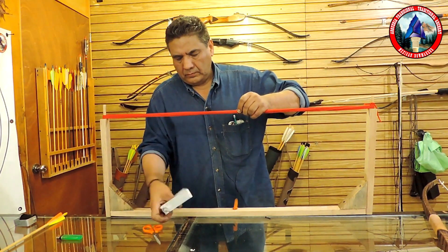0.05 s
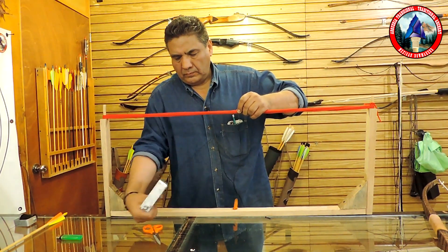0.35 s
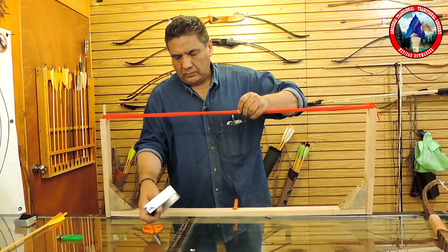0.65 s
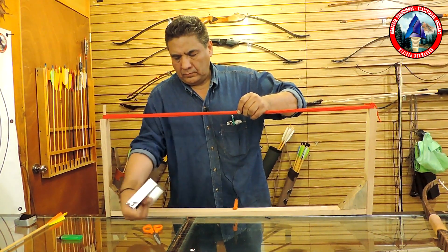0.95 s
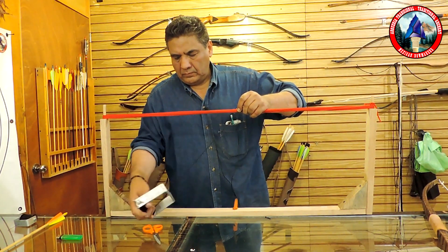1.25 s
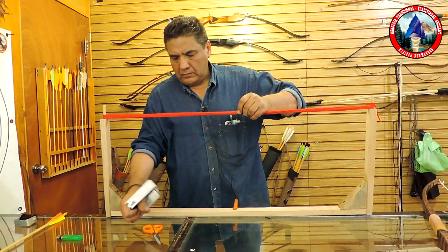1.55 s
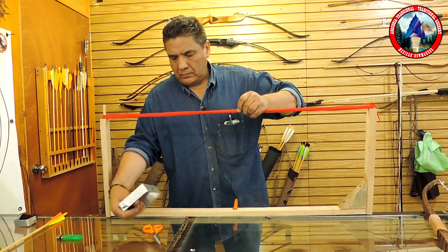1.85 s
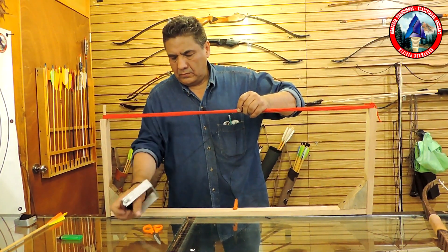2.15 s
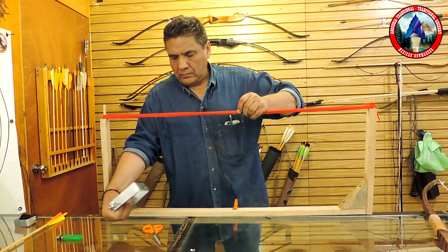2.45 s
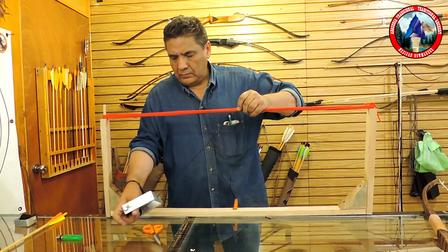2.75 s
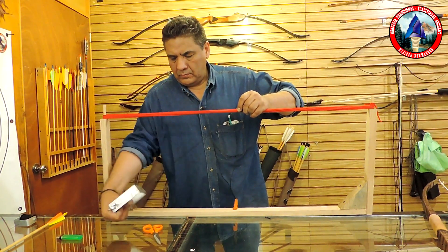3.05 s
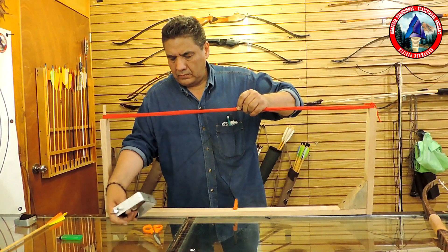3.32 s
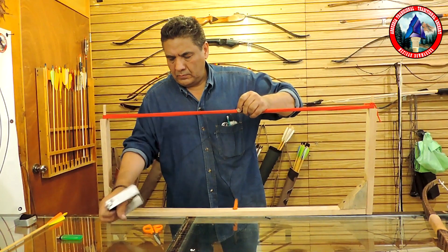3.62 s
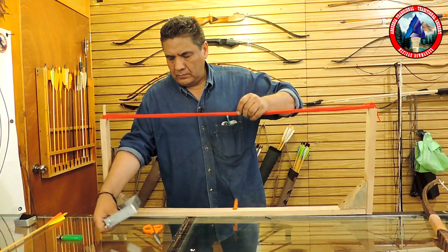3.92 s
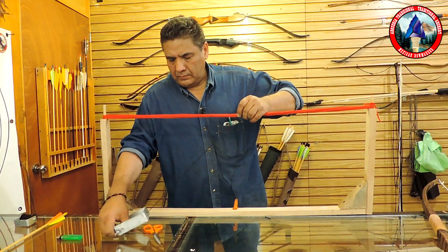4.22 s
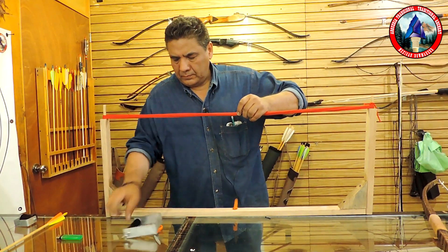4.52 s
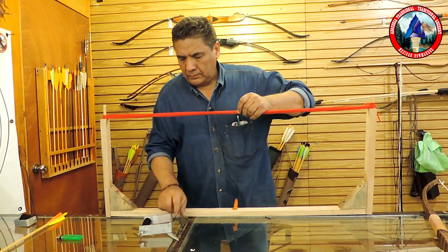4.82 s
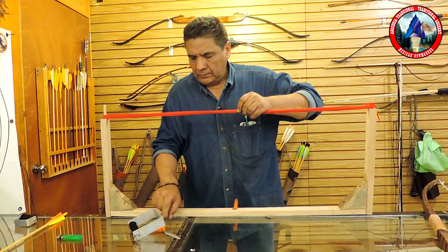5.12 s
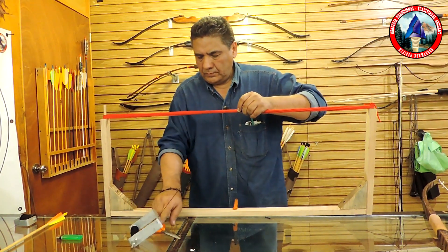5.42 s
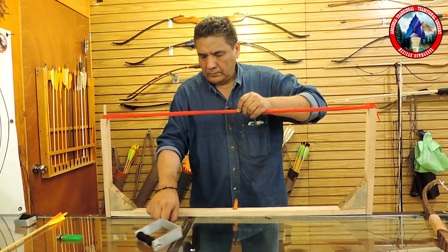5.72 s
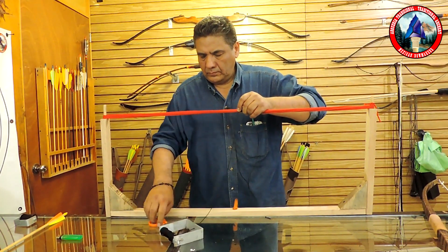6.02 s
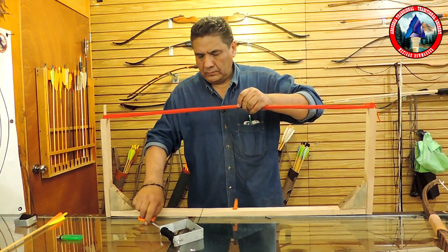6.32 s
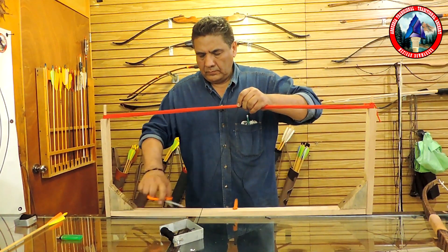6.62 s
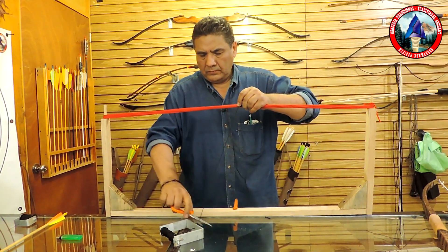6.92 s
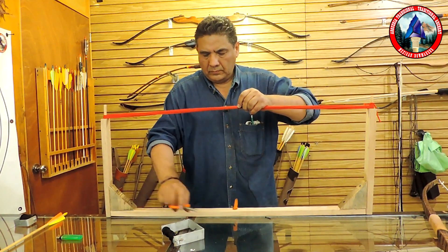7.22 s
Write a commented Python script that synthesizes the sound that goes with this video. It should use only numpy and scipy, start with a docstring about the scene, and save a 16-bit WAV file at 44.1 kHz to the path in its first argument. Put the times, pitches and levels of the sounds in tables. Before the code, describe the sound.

Faint rasps and ticks of pulled thread give way to loud knocks of a metal tool on glass, then a light scissor clink.

```python
"""Thread is drawn in short pulls off the spool of a homemade metal tool, to be wrapped round a string.
It slips and catches, so it rustles, ticks and rings the tool's frame. Then the tool is knocked down
onto a glass counter, where it rocks, scrapes and settles, and scissors clink as they are picked up.
Behind this are a brushing sleeve and the faint air noise and hum of a small shop.
A dull camera microphone hears it all, and a limiter turns down the loudest peaks."""
import sys
import numpy as np
from scipy import signal
from scipy.fft import rfft, irfft
from scipy.io import wavfile
from scipy.ndimage import uniform_filter1d, minimum_filter1d

SR = 44100
rng = np.random.default_rng(int(sys.argv[2]) if len(sys.argv) > 2 else 0)


def materialize(psi):
    """Save the field psi as 16-bit PCM at rate SR to the path in sys.argv[1].

    A 1-D psi becomes a single channel; in a 2-D psi each row is a channel.
    """
    bounded = np.clip(np.atleast_2d(psi).T, -1, 1)
    quanta = np.round(bounded * 32767).astype(np.int16)
    wavfile.write(sys.argv[1], SR, quanta)


N = 320607
T = np.arange(N) / SR
RING_T = T[:SR // 2]  # half a second for a sound to ring out

# firm pulls that tighten each turn round the string: (time [s], length [s], rasp [dB], rustle [dB])
PULLS = [(.37, 0.048, -47.5, -52.5), (1.035, 0.039, -49, -52.5), (1.755, .08, -50.5, -52.5),
         (2.385, 0.071, -59, -74), (2.455, 0.015, -51.5, -51.5), (3.145, 0.035, -51, -52.5),
         (3.81, 0.084, -59.5, -56)]
# the spool turning gently between pulls: (time [s], length [s], frame ring [dB], rustle [dB])
SPOOL_TURNS = [(0, 0.037, -51, -61.5), (.24, 0.065, -56.5, -62), (.33, .03, -47.5, -72),
               (.45, 0.052, -64, -77), (.945, 0.098, -47.5, -60), (1.03, 0.045, -46, -65),
               (1.17, 0.034, -58, -77), (1.265, 0.014, -56, -69), (1.32, 0.028, -54.5, -66),
               (1.615, 0.16, -51.5, -58.5), (2.0, 0.016, -56, -68), (2.228, 0.028, -58, -58.5),
               (2.335, 0.04, -52, -57.5), (2.6, 0.028, -57, -68), (2.725, 0.017, -55, -60.5),
               (3.03, 0.098, -51.5, -63), (3.21, 0.076, -61, -80), (3.365, 0.043, -59, -68.5),
               (3.57, 0.021, -60, -69), (3.675, 0.036, -52, -54.5), (3.785, 0.079, -51.5, -56)]
# A mode is a pitch at which a thing likes to ring; the wider it is, the sooner it dies away.
# the tool's frame, held in the hand: (pitch [Hz], width [Hz], level [dB])
FRAME_MODES = [(1920, 150, -21), (2077, 43, 14), (3600, 70, -10), (4100, 70, -15), (5050, 22, -6.5)]
# the spool rasping on its bolt: (pitch [Hz], width [Hz], level [dB])
SPOOL_MODES = [(1101, 47, -6), (1246, 52, -5.5), (1457, 150, -3.5), (1700, 81, -0.5), (1854, 65, 3.5)]
# thread hissing over the tool's edges: (pitch [Hz], width [Hz], level [dB])
RUSTLE_MODES = [(2350, 470, 1), (2875, 170, -5.5), (3030, 170, -1), (3580, 550, 2), (4080, 350, -2.5),
                (4480, 290, -1.5), (5000, 370, -11.5), (5730, 260, -11.5)]
# the tight thread creaking: (time [s], length [s], first pitch [Hz], last pitch [Hz], level [dB])
CREAKS = [(1.105, 0.097, 600, 517, -70.5), (1.397, 0.043, 354, 323, -67), (1.793, 0.13, 319.4, 347, -69.5),
          (2.015, 0.067, 592, 599, -69.5), (4.085, 0.02, 320, 315, -67.5)]
# thread snapping free: (time [s], level [dB], squeak pitch [Hz], squeak width [Hz], squeak level [dB])
TICKS = [(.003, -7, 5050, 100, -17), (.3635, 3.5, 5000, 200, -14), (.515, -14, 1900, 200, -23),
         (.937, -23, 1900, 200, -13), (1.312, -9.5, 4100, 100, -7), (1.335, -12, 4070, 100, -10),
         (1.744, -10.5, 3600, 200, 0), (1.762, -2, 1410, 400, -2.5), (1.795, -15, 1673, 200, -4),
         (1.98, -21, 1070, 80, -5.5), (2.005, -23, 5050, 100, -6), (2.228, -2, 3600, 80, -13.5),
         (2.457, -5, 4870, 300, 3), (2.596, -21, 1850, 200, -3), (2.725, -9, 4570, 120, -6.5),
         (2.734, -9.5, 1800, 200, -8), (3.021, -15, 1270, 100, -22), (3.139, -9, 5000, 160, -3),
         (3.674, -9, 3600, 100, -18), (3.692, -5, 1230, 100, -17), (3.782, -8.5, 5140, 200, -24)]

# the tool hitting the counter:
# (time [s], level [dB], thud [dB], treble [dB], corner pitch [Hz], delay of the second edge [s])
KNOCKS = [(4.319, -0.5, -3.5, 2.5, 2800, 0.0023), (4.408, 1.5, 5, -4, 2350, .001),
          (4.564, -34.5, 6, -4, 700, 0.0026), (4.673, -0.5, -1.5, 2.5, 3700, 0.0031),
          (4.708, -3.5, 5, 1, 3000, .003), (4.78, -10.5, 2, 4, 4400, .005),
          (4.912, -29, 5.5, -14, 2730, 0.009), (4.992, -27.5, 0, -0.5, 2280, .003),
          (4.9978, 1.5, -3, -6, 1480, 0.0029), (5.012, -7.5, -8, 0.5, 3200, 0.0032),
          (5.085, -19, 0, -6.5, 1796, 0.0053), (5.118, -20, 7, -3.5, 2290, .004),
          (5.136, -20.5, 11, -5, 2820, 0.0044), (5.1473, -3.5, 7, 2.5, 2320, 0.0054),
          (5.158, -6.5, 2, -2, 3200, .003), (5.735, -23, 2.5, -5, 3700, 0.0036),
          (5.7453, -2, -2.5, -8, 2300, .0017), (5.908, 1.5, -7, 1, 2500, .003),
          (5.9306, -9.5, -5, 1.5, 3900, 0.0054), (5.957, -3, -2.5, 1.5, 2400, 0.0039),
          (5.980, -5.5, -4, 1.5, 3170, 0.0032), (5.997, -10, 5.5, 3, 2650, 0.0044),
          (6.013, -23, 11, 0, 1420, 0.0097), (6.17, -33.5, 11, -3, 1700, .012),
          (6.224, -16.5, 0.5, 3.5, 1830, .003)]
# A colour says how strong the low and high parts of a sound are.
# the crack of a knock: (frequency [Hz], level [dB])
KNOCK_COLOUR = [(25, -24), (60, -30.5), (95, -28.5), (125, -23), (185, -17), (260, -11.5), (700, -9),
                (1320, -5.5), (1800, -1), (3120, -1), (4750, -5.5), (6060, -20), (6750, -35.5), (8800, -55)]
# tool and glass clanking: (pitch [Hz], level [dB])
CLANK_MODES = [(834, -6.5), (1060, -9), (1715, -8), (2046, 3), (2379, 4.5), (2487, -2.5), (2708, -1.5),
               (2777, -6), (2942, -7), (3110, 1), (3307, -2), (3490, 4), (3756, -3), (3922, -5), (3990, -2),
               (4247, -6.5), (4450, -11), (5313, -19)]
# the counter top booming: (pitch [Hz], level [dB])
COUNTER_MODES = [(123, -4), (162, -3.5), (236, 2), (318, 2), (400, -1.5), (465, 1), (690, 0)]
# a bright click on one hard landing: (time [s], level [dB])
BRIGHT_CLICK = (5.9115, -9)
# the tool dragging over the glass: (time [s], length [s], level [dB])
DRAGS = [(4.89, 0.26, -50), (5.68, 0.14, -47), (6.05, .2, -54)]
# the counter under the dragging tool: (pitch [Hz], width [Hz], level [dB])
DRAG_MODES = [(126, 19, -7.5), (300, 63, -1.5), (400, 70, 1), (537, 120, -6.5), (780, 160, -3),
              (1060, 140, -12), (1420, 200, -7), (1850, 160, -8), (2400, 150, -6.5), (3400, 900, -16.5)]

# scissors tapping the glass: (time [s], level [dB])
SCISSOR_TAPS = [(6.332, -18), (6.686, -48.5), (7.16, -42), (7.2222, -34.5)]
# the click of a tap: (frequency [Hz], level [dB])
TAP_COLOUR = [(150, -17.5), (600, -16), (950, -2), (1800, 2), (2600, -5.5), (4200, -2.5), (5000, 2.5),
              (6000, -12), (7200, -54)]
# the steel blades ringing: (pitch [Hz], level [dB])
BLADE_MODES = [(946, 3.5), (1518, -13), (1853, 3), (1974, 7), (3340, -10), (3617, -15), (3980, 4),
               (4087, -13), (4340, -1), (4744, 7.5), (5000, -14), (5300, -16)]
# scissors sliding on the glass: (time [s], length [s], level [dB])
SLIDES = [(6.688, 0.023, -49.5), (7.165, .05, -63), (7.223, 0.0057, -51.5)]
# the scrape of a slide: (frequency [Hz], level [dB])
SLIDE_COLOUR = [(500, -11), (2400, -7.5), (3600, 5.5), (4400, 4.5), (5200, -8.5), (7200, -14.5)]

# sleeve and hand brushing along: (time [s], length [s], level [dB])
BRUSHES = [(.39, .03, -65.5), (1.28, 0.15, -66), (1.77, 0.054, -63.5), (2.74, 0.061, -70.5),
           (3.17, 0.19, -71), (3.83, 0.11, -64.5), (4.3, 0.016, -64), (6.22, 0.16, -60),
           (6.8, 0.074, -66.5), (7.15, 0.11, -70.5)]
# the dull sound of cloth: (frequency [Hz], level [dB])
SLEEVE_COLOUR = [(60, -18.5), (150, -8), (320, 0), (750, -4), (1200, -8.5), (2400, -15.5), (4000, -22.5),
                 (7000, -44.5)]
# air from the shop's vents: (frequency [Hz], level [dB])
AIR_COLOUR = [(20, 4.5), (60, -4), (130, 3.5), (230, 1.5), (380, 4), (650, -2.5), (1200, -2), (1650, -2),
              (2200, -2), (3800, -3.5), (5200, -5.5), (6500, -19.5)]
# the tones of a humming motor: (pitch [Hz], level [dB])
HUM_TONES = [(177.6, -70.5), (1297, -82), (2481, -80.5)]
# how long the shop echoes: (frequency [Hz], time to fade by 60 dB [s])
ECHO_TIMES = [(100, 0.46), (260, 0.42), (700, 0.3), (1840, 0.29), (4850, 0.26), (8000, 0.4)]


def thread(ring_db=-2, rasp_db=-1, rustle_db=-1, catch_db=2.5):
    """Thread leaves the spool in tiny, rustling slips. Firm pulls rasp; gentle turns ring the frame."""
    pull, pull_rustle = strokes(PULLS, rise_s=0.041, fall_s=0.055)
    turn, turn_rustle = strokes(SPOOL_TURNS, rise_s=0.057, fall_s=0.039)
    slips = grains(per_second=700, spread_db=10.5)
    fibres = grains(per_second=2400, spread_db=11)
    catching_db = catch_db * wander(45)  # the thread drags in fits and starts
    frame = drift_pitch(unit(resonate(slips, FRAME_MODES)), depth=0.015)
    frame *= np.hypot(turn, undb(-3.5) * pull) * undb(ring_db + catching_db)
    rasp = drift_pitch(unit(resonate(slips, SPOOL_MODES)), depth=0.022)
    rasp *= np.hypot(pull, undb(-10) * turn) * undb(rasp_db)
    rustle = unit(resonate(fibres, RUSTLE_MODES))
    rustle *= np.hypot(pull_rustle, turn_rustle) * undb(rustle_db)
    return room(frame + rasp + rustle + creaks(), echo_db=-7.5)


def creaks(level_db=5.5):
    """The tight thread sounds a faint, fluttering note that glides as its free length changes."""
    notes = np.zeros(N, complex)
    for start, length, first_hz, last_hz, db in CREAKS:
        hz = np.interp(T, [start, start + length], [first_hz, last_hz])
        note = np.exp(2j * np.pi * np.cumsum(hz) / SR)
        notes += undb(db + level_db) * stroke(start, length, rise_s=.11, fall_s=.11) * note
    flutter = .9 + .7 * (wander(70) + 1j * wander(70))  # shakes both loudness and pitch
    return np.real(flutter * notes)


def ticks(level_db=-11.5, grip_detune=0.0055):
    """The thread catches and jumps: the frame clinks, with a squeak. The grip shifts the clink's pitch."""
    out = np.zeros(N)
    flick = signal.unit_impulse(len(RING_T))
    tunings = 1 + grip_detune * rng.standard_normal(len(TICKS))
    for (start, db, squeak_hz, squeak_width_hz, squeak_db), tuning in zip(TICKS, tunings):
        gripped_modes = [(hz * tuning, width, mode_db) for hz, width, mode_db in FRAME_MODES]
        clink = unit_energy(resonate(flick, gripped_modes))
        squeak = unit_energy(resonate(flick, [(squeak_hz, squeak_width_hz, 0)]))
        add(out, start, undb(db + level_db) * (clink + undb(squeak_db) * squeak))
    return room(out, echo_db=-5.5)


def knocks(level_db=17, second_edge_db=-1.5, clank_db=-4, boom_db=-18, corner_db=-6, corner_width_hz=550):
    """The tool lands on one edge, then the other. Each hit cracks, clanks and makes the counter boom."""
    out = np.zeros(N)
    for start, db, thud_db, treble_db, corner_hz, delay in KNOCKS:
        tone = [(50, thud_db - 3), (120, thud_db), (650, thud_db),
                (1900, 0), (3400, 0.0032), (5200, treble_db)]
        for hit_time, edge_db in [(start, 0), (start + delay, second_edge_db)]:
            contact = crack(fade_s=.024, contact_db=-3)
            # the corner that lands gives the knock its own pitch
            corner = unit_energy(resonate(contact, [(corner_hz, corner_width_hz, 0)]))
            clack = unit_energy(colour(contact, KNOCK_COLOUR)) + undb(corner_db) * corner
            hit = room(clack, echo_db=-1.5)
            hit += undb(clank_db) * ring(CLANK_MODES, fade_s=0.21)
            hit += undb(boom_db) * ring(COUNTER_MODES, fade_s=0.31)
            add(out, hit_time, undb(db + edge_db + level_db) * colour(unit_energy(hit), tone))
    return out


def tool_drag():
    """The tool sticks and slips as it slides over the glass, so the counter sounds a scrape."""
    sliding = strokes(DRAGS, rise_s=.26, fall_s=0.19)[0]
    slips = grains(per_second=2200, spread_db=14.5)
    return room(unit(resonate(slips, DRAG_MODES)) * sliding, echo_db=-6)


def scissors(tap_db=12, blade_db=-4):
    """Steel blades scrape and tap the glass as they are lifted, ringing briefly at each tap."""
    scrape = unit(colour(grains(per_second=2800, spread_db=4), SLIDE_COLOUR))
    out = scrape * strokes(SLIDES, rise_s=0.03, fall_s=0.047)[0]
    for start, db in SCISSOR_TAPS:
        tap = unit_energy(colour(crack(fade_s=0.03, contact_db=1.5), TAP_COLOUR))
        blades = undb(blade_db) * ring(BLADE_MODES, fade_s=0.087)
        add(out, start, undb(db + tap_db) * (tap + blades))
    return room(out, echo_db=-5)


def sleeve(waver_db=1.7):
    """Cloth and hand rub along; their many tiny slips blur into a soft, dull brushing."""
    brushing = strokes(BRUSHES, rise_s=0.15, fall_s=0.16)[0]
    cloth = unit(colour(grains(per_second=4700, spread_db=7.5), SLEEVE_COLOUR))
    return cloth * brushing * undb(waver_db * wander(30))


def shop(air_db=-66.5, waver_db=.4):
    """Air rushes softly from the vents while a motor hums."""
    air = unit(colour(rng.standard_normal(N), AIR_COLOUR)) * undb(air_db + waver_db * wander(2.2))
    hum = sum(np.sqrt(2) * undb(db) * np.sin(2 * np.pi * hz * T) for hz, db in HUM_TONES)
    return air + hum


def room(x, echo_db, first_echo_s=0.0023, hold_s=0.026):
    """Add the shop's dense echoes: they hold steady for a moment, then die away, the bass last."""
    noise = rfft(rng.standard_normal(len(RING_T)))
    hz = np.fft.rfftfreq(len(RING_T), 1 / SR)
    fading_time = np.maximum(RING_T - hold_s, 0)
    echoes = 0
    for band_hz, fade_s in ECHO_TIMES:
        band = on_log_axis(hz, [(f, f == band_hz) for f, _ in ECHO_TIMES])
        echoes += irfft(noise * band, len(RING_T)) * fade(fade_s, fading_time)
    return x + undb(echo_db) * convolve(x, unit_energy(echoes * (RING_T > first_echo_s)))


def grains(per_second, spread_db):
    """Tiny slips: single clicks at random times and of uneven size."""
    slipping = rng.random(N) < per_second / SR
    return unit(slipping * rng.standard_normal(N) * undb(spread_db * rng.random(N)))


def crack(fade_s, contact_db):
    """A hard contact: one sharp click and a quickly fading burst of noise."""
    burst = unit_energy(rng.standard_normal(len(RING_T)) * fade(fade_s))
    burst[0] += undb(contact_db)
    return unit_energy(burst)


def resonate(x, modes, rise_s=.0008):
    """Let x shake modes (pitch [Hz], width [Hz], level [dB]); neighbours swing opposite ways."""
    response = 0
    for k, (hz, width, db) in enumerate(modes):
        swing = np.cos(2 * np.pi * hz * RING_T) * np.exp(-np.pi * width * RING_T)
        response += (-1) ** k * undb(db) * width * swing
    return convolve(x, response * -np.expm1(-RING_T / rise_s))


def ring(modes, fade_s, scatter_db=2, detune=.003, rise_s=.0005):
    """Strike modes (pitch [Hz], level [dB]); chance stands in for where the blow lands."""
    tones = 0
    for hz, db in modes:
        side, size, shift = rng.standard_normal(3)
        swing = np.cos(2 * np.pi * hz * (1 + detune * shift) * RING_T)
        tones += np.sign(side) * undb(db + scatter_db * size) * swing
    return unit_energy(tones * fade(fade_s) * -np.expm1(-RING_T / rise_s))


def stroke(start, length, rise_s, fall_s):
    """One movement swells until start, holds, then fades; rise_s and fall_s each cover 30 dB."""
    distance = np.maximum(start - T, 0) / rise_s + np.maximum(T - start - length, 0) / fall_s
    return undb(-30 * np.minimum(distance, 6))


def strokes(rows, rise_s, fall_s):
    """Join movements (time [s], length [s], level [dB], ...) into one loudness curve per level column."""
    power = sum(undb(levels)[:, None] ** 2 * stroke(start, length, rise_s, fall_s) ** 2
                for start, length, *levels in rows)
    return np.sqrt(power)


def wander(per_second):
    """A smooth random wobble, about 1 in size."""
    step = int(SR / per_second)
    stairs = np.repeat(rng.standard_normal(N // step + 1), step)
    return unit(uniform_filter1d(stairs, step)[:N])


def drift_pitch(x, depth):
    """Play x a little faster and slower, so all its pitches drift together."""
    return np.interp(T + np.cumsum(depth * wander(16)) / SR, T, x)


def colour(x, points, size=4096):
    """Shape the lows and highs of x to follow points (frequency [Hz], level [dB])."""
    gain = undb(on_log_axis(np.fft.rfftfreq(size, 1 / SR), points))
    cepstrum = irfft(np.log(gain))
    # fold the second half onto the first, so the filter never sounds before its input
    cepstrum[1:size // 2] *= 2
    cepstrum[size // 2 + 1:] = 0
    return convolve(x, irfft(np.exp(rfft(cepstrum))))


def on_log_axis(hz, points):
    """Read between points (frequency [Hz], value), with octaves evenly spaced."""
    point_hz, values = np.transpose(points)
    return np.interp(np.log(hz + 1), np.log(point_hz), values)


def fade(fade_s, t=RING_T):
    """Die away by 60 dB every fade_s seconds."""
    return np.exp(-np.log(1000) * t / fade_s)


def convolve(x, response):
    """Let every sample of x set off the response, keeping the length of x."""
    return signal.fftconvolve(x, response)[:len(x)]


def add(out, start, sound):
    """Mix a sound in at start seconds."""
    i = max(int(start * SR), 0)
    out[i:i + len(sound)] += sound[:N - i]


def undb(db):
    """Turn decibels into a factor to multiply by."""
    return 10 ** (np.asarray(db) / 20)


def unit(x):
    """Scale a long sound to an average power of 1."""
    return x / np.sqrt(np.mean(x ** 2))


def unit_energy(x):
    """Scale a short sound to a total energy of 1."""
    return x / np.sqrt(np.sum(x ** 2))


def scene():
    """All the sounds that reach the microphone, in one channel."""
    return (thread() + ticks() + knocks() + tool_drag() + scissors() + sleeve() + shop())[None]


def record(dry, mic_hz=6900, ceiling=0.67, hiss_db=-76, top_hz=15700):
    """Dull the sound, limit its peaks, add amplifier hiss and one bright click, then cut the very top."""
    dull = signal.sosfilt(signal.cheby1(10, .3, mic_hz, fs=SR, output="sos"), dry[0])
    gain = np.minimum(1, ceiling / (np.abs(dull) + 1e-9))
    gain = minimum_filter1d(gain, size=96)  # stay turned down around each peak
    gain = uniform_filter1d(uniform_filter1d(gain, size=48), size=48)  # ease down and back up
    hiss = colour(rng.standard_normal(N), [(7000, -0.64), (11000, 0.37), (15000, -1)])
    mix = dull * gain + undb(hiss_db) * hiss
    click_time, click_db = BRIGHT_CLICK
    click = colour(crack(fade_s=0.0037, contact_db=2), [(7000, -6.5), (11000, -0.5), (15000, -13)])
    add(mix, click_time, undb(click_db) * click)
    return signal.sosfilt(signal.ellip(10, .2, 70, top_hz, fs=SR, output="sos"), mix)[None]


dry = scene()
out = record(dry)
materialize(out)
```